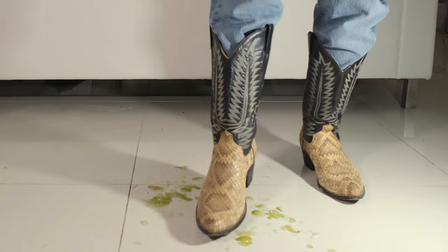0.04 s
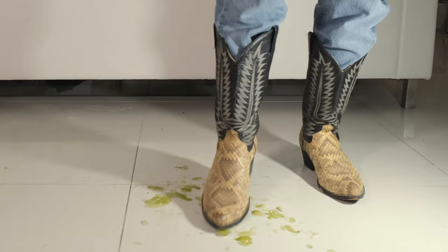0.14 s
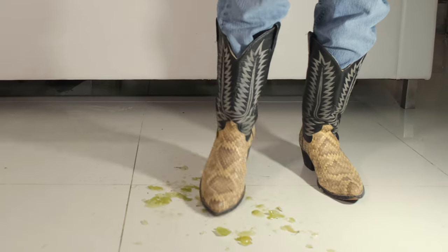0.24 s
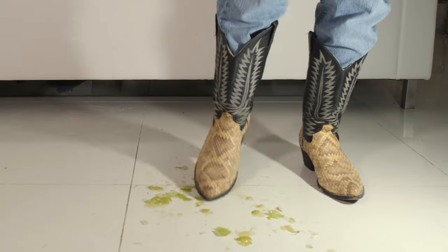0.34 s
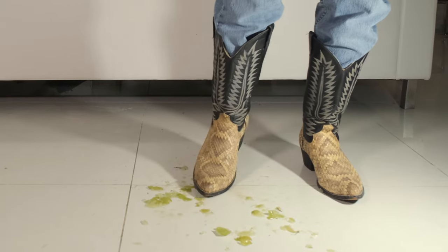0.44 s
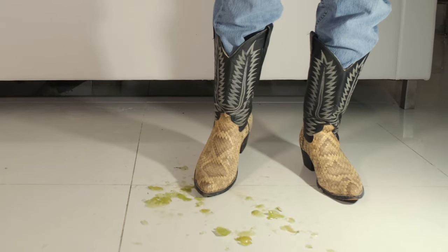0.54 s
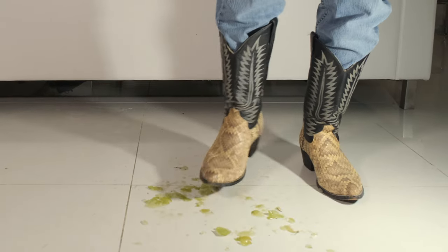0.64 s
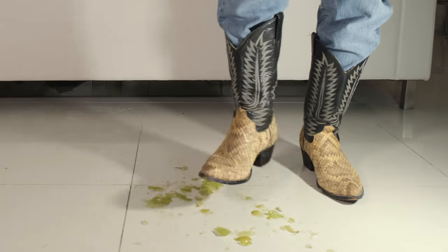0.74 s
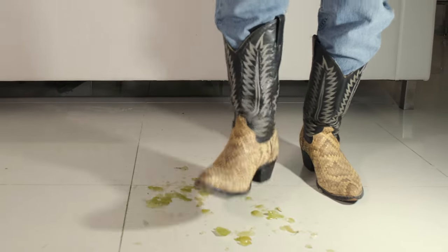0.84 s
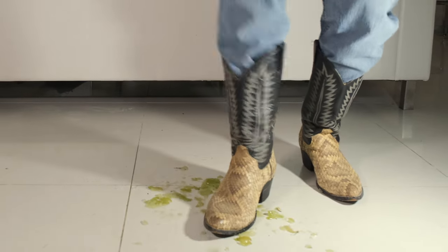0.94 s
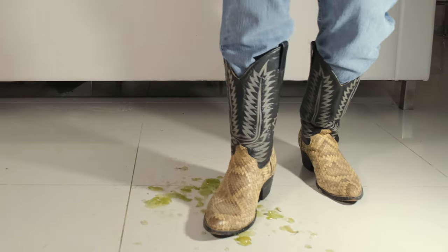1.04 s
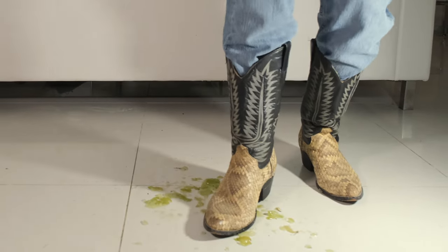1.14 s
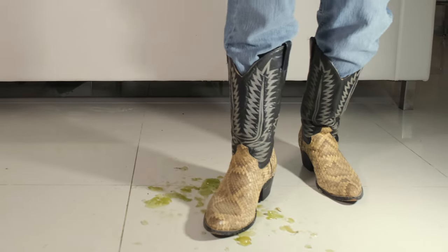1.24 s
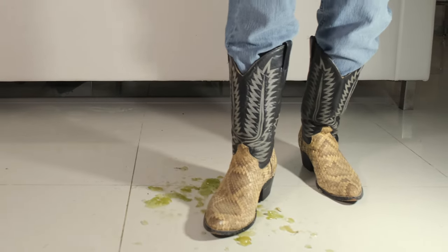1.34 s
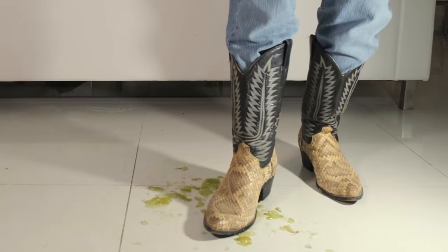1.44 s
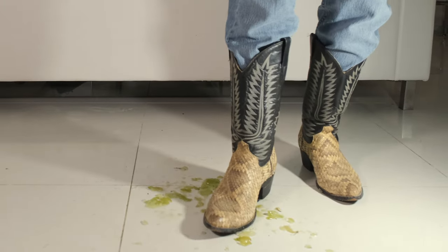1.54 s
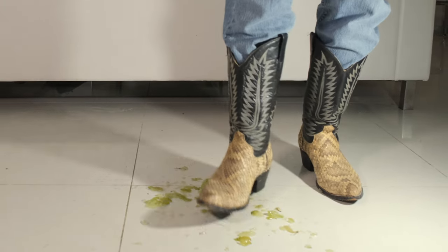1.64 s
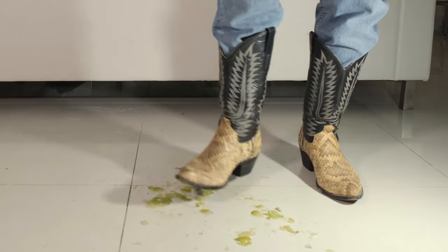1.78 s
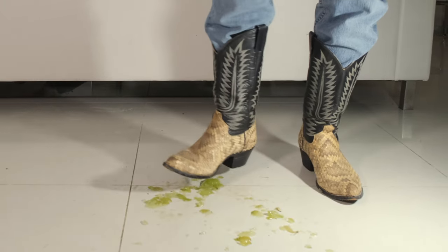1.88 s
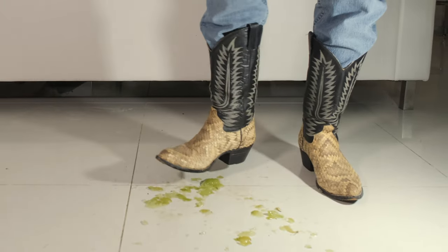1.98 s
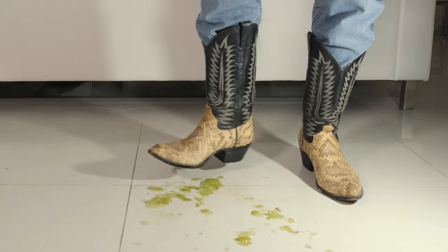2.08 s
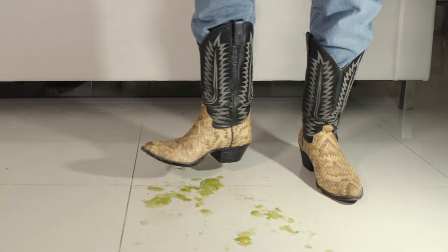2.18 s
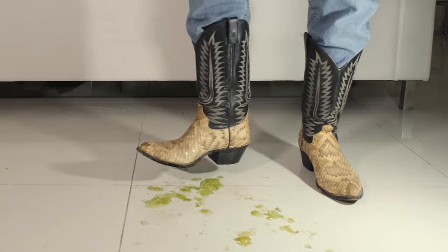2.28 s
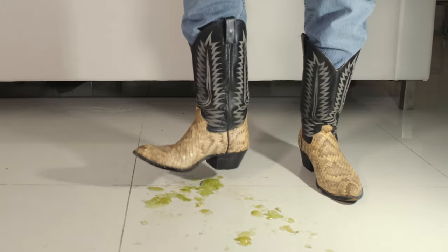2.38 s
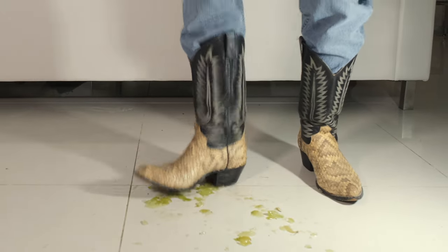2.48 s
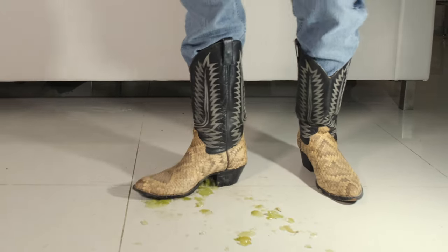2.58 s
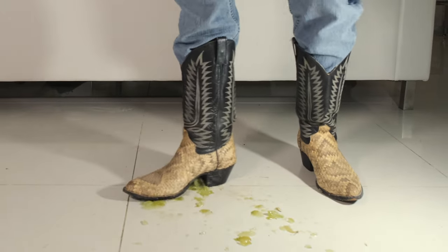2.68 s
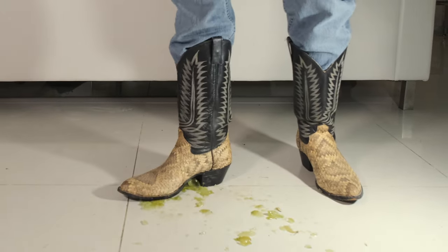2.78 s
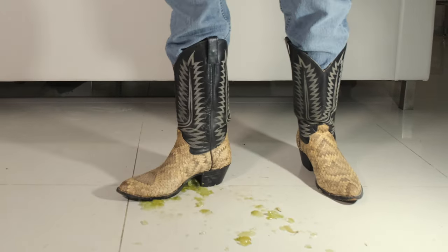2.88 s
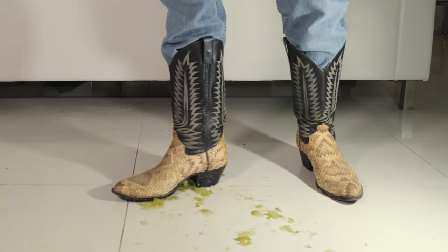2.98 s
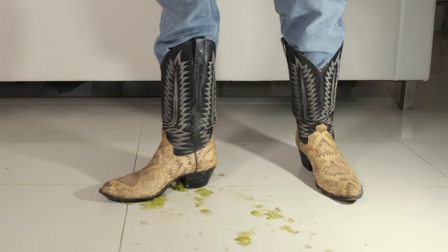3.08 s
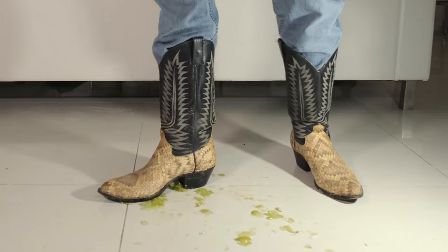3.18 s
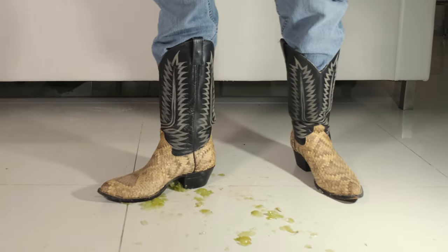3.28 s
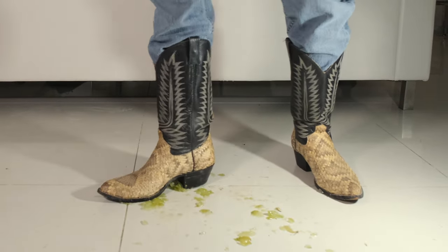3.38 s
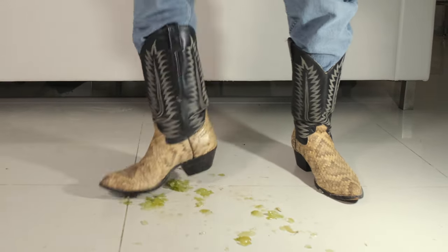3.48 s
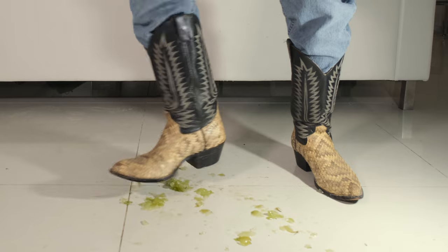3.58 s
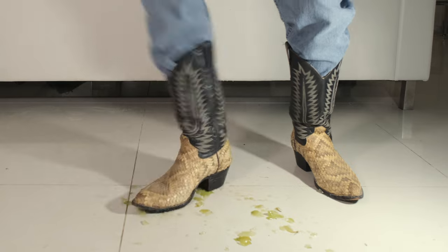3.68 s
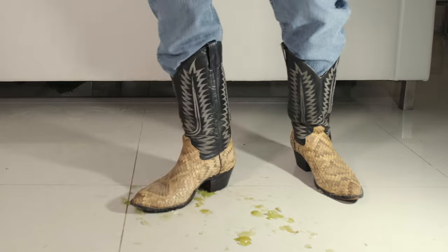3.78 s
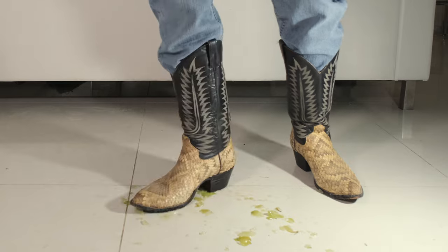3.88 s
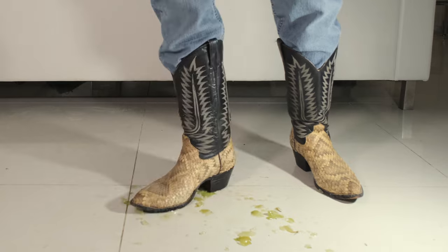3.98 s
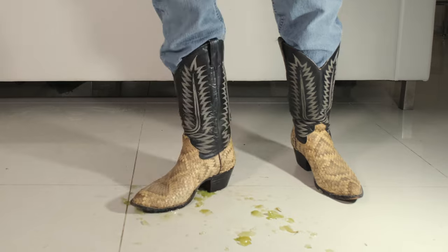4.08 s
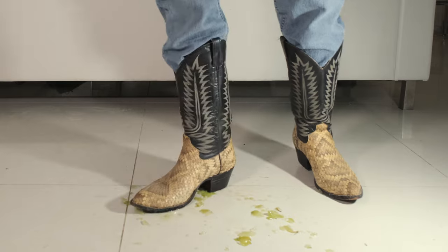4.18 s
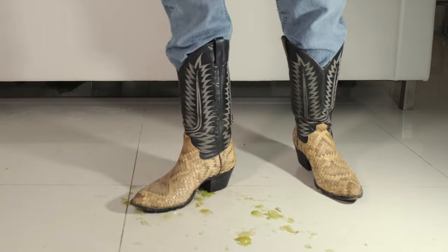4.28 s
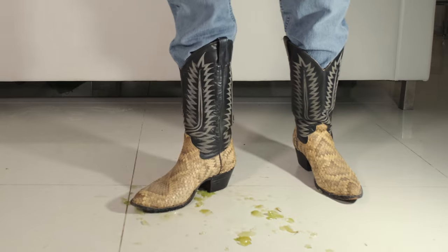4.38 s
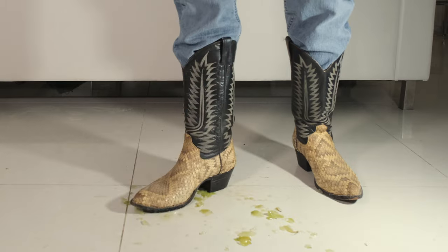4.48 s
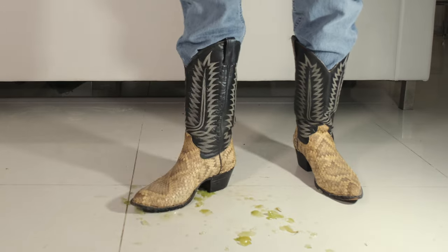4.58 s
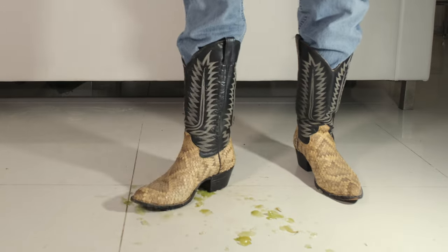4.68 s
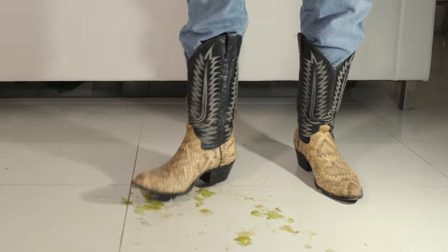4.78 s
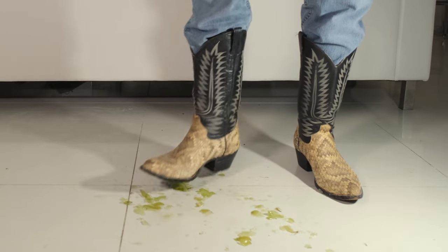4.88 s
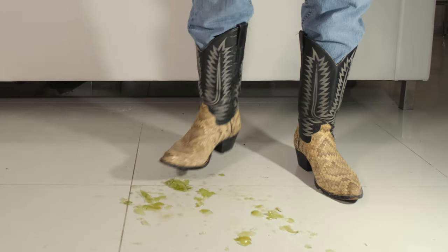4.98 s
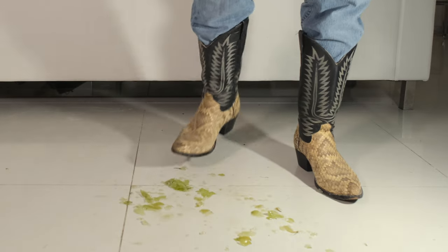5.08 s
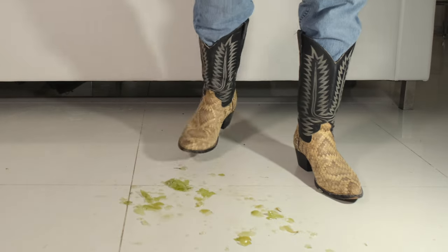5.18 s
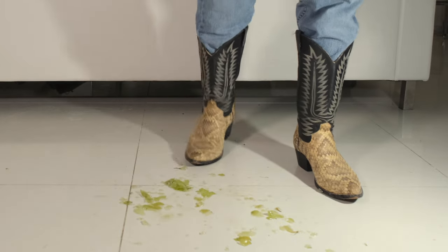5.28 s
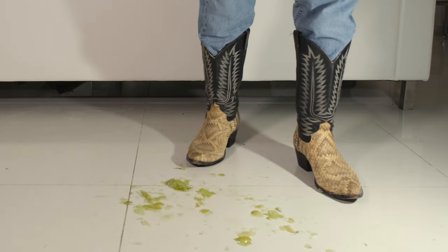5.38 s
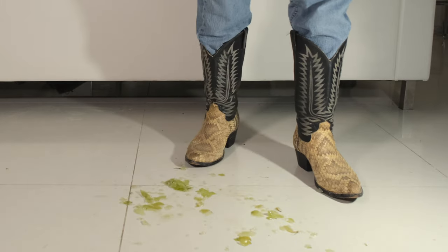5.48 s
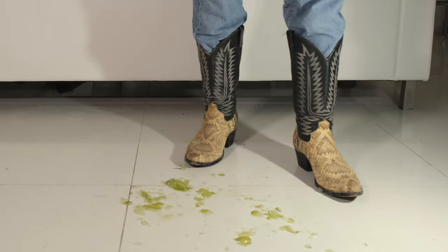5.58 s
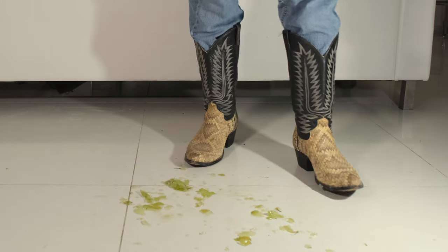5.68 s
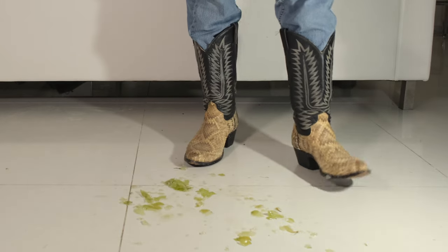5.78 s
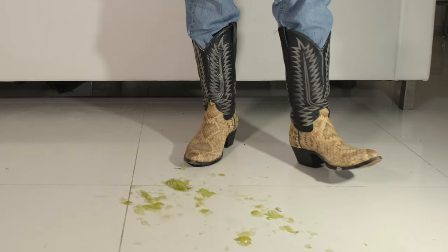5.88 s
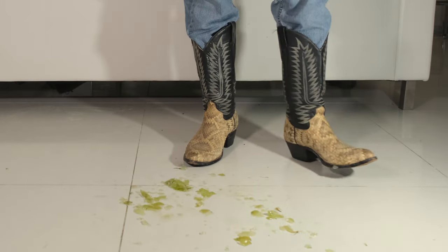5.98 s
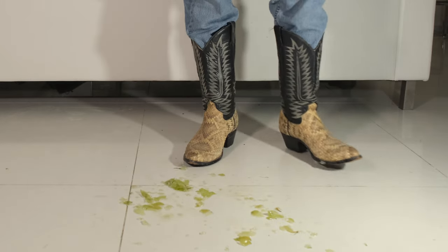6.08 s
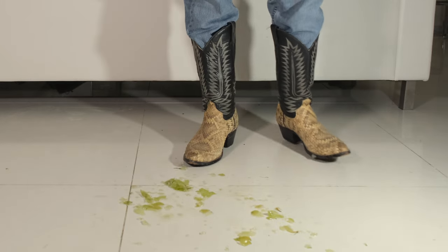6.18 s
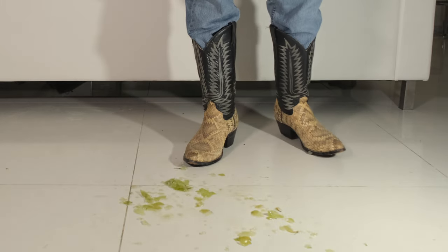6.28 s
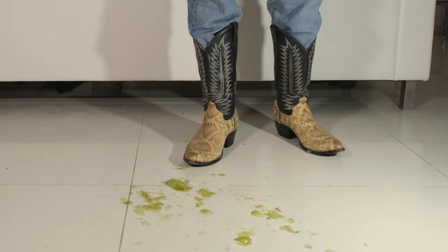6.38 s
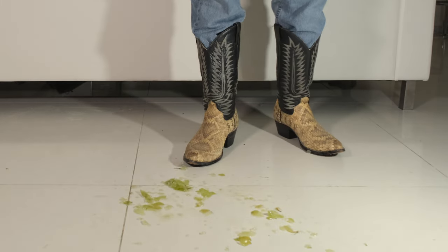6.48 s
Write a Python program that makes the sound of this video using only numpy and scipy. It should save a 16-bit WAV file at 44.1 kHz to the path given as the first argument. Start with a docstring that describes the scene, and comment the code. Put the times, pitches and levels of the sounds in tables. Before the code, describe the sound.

Close to a hard tiled floor in a bare, echoing room, a boot scuffs briefly and its heel stomps hard. Cloth rustles, then a foot lands on soft fruit with a loud, wet, crackling splat and a low floor thud. Sticky ticks follow, another hard heel stomp, then peeling smacks and light, dull steps. Low ventilation hums throughout.

```python
"""Boots on a tiled floor: two hard heel stomps, a squashed fruit, sticky soles peeling off the pulp, light steps.
Heels are short damped swings with a slap of noise; smacks and scuffs are noise bursts in resonances.
Denim and leather rustle as shaped friction noise; ventilation hums as filtered noise; the floor thuds.
A bare, echoing room answers every boot and cloth sound; the hardest blows clip."""
import sys
import numpy as np
from scipy import signal
from scipy.fft import rfft, irfft, next_fast_len
from scipy.io import wavfile
from scipy.ndimage import uniform_filter1d

SR = 44100
rng = np.random.default_rng(int(sys.argv[2]) if len(sys.argv) > 2 else 0)


def dump(signal):
    """Clip the signal to [-1, 1] and save it as 16-bit WAV at the path in sys.argv[1]."""
    limited = np.clip(np.atleast_2d(signal).T, -1, 1)
    pcm = np.round(limited * 32767).astype(np.int16)
    wavfile.write(sys.argv[1], SR, pcm)


N = 288268


def amp(db):
    """Amplitude factor of a level in dB."""
    return 10 ** (np.asarray(db) / 20)


def unit(x):
    """x scaled to RMS 1."""
    return x / np.sqrt(np.mean(x ** 2) + 1e-20)


def peak(x):
    """x scaled to peak 1."""
    return x / np.max(np.abs(x))


def along(points, hz):
    """Interpolates (Hz, value) points on a log frequency axis."""
    point_hz, values = np.transpose(points)
    return np.interp(np.log(hz + 1), np.log(point_hz + 1), values)


def filtered(x, response):
    """x times a complex response of frequency, zero-padded against wrap-around."""
    n = np.shape(x)[-1]
    padded = next_fast_len(n + 8192)
    spectrum = rfft(x, padded) * response(np.fft.rfftfreq(padded, 1 / SR))
    return irfft(spectrum, padded)[..., :n]


def resonance(f, hz, width_hz):
    """One causal resonance of peak gain 1."""
    return 1j * f * width_hz / (hz * hz - f * f + 1j * f * width_hz)


def modes(table):
    """Response of a body: its modes summed with alternating sign."""
    def response(f):
        return sum((-1) ** k * amp(db) * resonance(f, hz, width_hz)
                   for k, (hz, width_hz, db) in enumerate(table))
    return response


# Diffuse sound at the microphone pair. Each row: frequency in Hz, left-right correlation (0 to 1).
LIKENESS = [(60, 1.0), (180, 1.0), (550, 1), (1650, 0.45), (4970, 0.02), (15000, 0.043)]


def diffuse(pair):
    """Mixes two unrelated signals to the likeness that a close microphone pair hears."""
    def mid_side_gains(hz):
        turn = np.arccos(np.clip(along(LIKENESS, hz), -1, 1)) / 2
        return np.array([np.cos(turn), np.sin(turn)])
    mid, side = filtered(pair, mid_side_gains)
    return np.array([mid + side, mid - side])


# Decay of the room. Each row: frequency in Hz, t60 in s.
ROOM_T60 = [(100, 0.45), (300, 0.59), (700, 0.85), (1800, 0.96), (4800, 0.97), (9000, 0.76), (12000, 0.6),
            (15500, 0.12)]
# Colour of the tail. Each row: frequency in Hz, gain in dB.
TAIL_GAIN = [(100, -5), (250, -1), (450, -5.5), (800, -2), (1500, -1.5), (4000, -3.5), (10000, -2.5),
             (15500, 2.5)]
# First echoes. Each row: delay in s, level re direct sound in dB.
WALL_ECHOES = [(.0045, -21), (.008, -13.5), (.012, -19), (0.0215, -22), (.031, -25), (.045, -25.5)]


def room(x, colour):
    """First echoes of x, then a fresh noise tail in which each frequency dies at its own speed."""
    hz, t, noise = signal.stft(rng.standard_normal((2, SR)), SR, nperseg=256)
    decay = amp(-60 * t / along(ROOM_T60, hz)[:, None])
    tail = signal.istft(noise * decay, SR, nperseg=256)[1][:, :SR]
    tail = tail * np.clip(np.arange(SR) / SR / .015, 0, 1)  # builds up over 15 ms
    tail = diffuse(tail / np.linalg.norm(tail[0]))
    tail = filtered(tail, lambda f: amp(along(TAIL_GAIN, f)))
    walls = np.zeros((1, SR))
    for delay_s, db in WALL_ECHOES:
        walls[0, round(delay_s * SR)] = amp(db)
    echoes = signal.fftconvolve(x, walls, axes=1)
    return echoes + signal.fftconvolve(colour[None], tail, axes=1)


def add(mix, s, sound, colour):
    """Places a stereo sound; the tail hears all directions of the source, hence only its mean colour."""
    heard = room(sound, colour)
    heard[:, :sound.shape[1]] += sound
    start = round(s * SR)
    mix[:, start:start + heard.shape[1]] += heard


PORT_LAG_S = 2e-5  # between the two microphone ports, source on the floor


def burst(envelope, response, spiky_db):
    """A stereo noise burst of peak 1, and one click of the same colour and energy."""
    n = len(envelope)
    common, own = rng.standard_normal(n), rng.standard_normal((2, n))
    apart = 0.44  # weight of the noise that differs between the ports
    spikes = amp(spiky_db * rng.standard_normal(n))
    snaps = (common + apart * own) * spikes * envelope

    def ports(f):
        return response(f) * np.exp(-2j * np.pi * f * PORT_LAG_S * np.array([[0], [1]]))
    sound = peak(filtered(snaps, ports))
    impulse = 1. * (np.arange(n) == np.argmax(envelope))
    click = filtered(impulse, response)
    return sound, unit(click) * np.sqrt(np.mean(sound ** 2))


STROKE_DEPTH_DB = 14.5  # start and end level under the peak


def stroke(rise_s, fall_s):
    """Grainy noise, and a level that climbs to its peak and sinks again, with soft edges."""
    noise = rng.standard_normal((2, SR))
    t = np.arange(-rise_s, fall_s, 1 / SR)
    grain = noise[0] * amp(2.7 * unit(uniform_filter1d(noise[1], size=60)))
    edge = np.clip(np.minimum(t - t[0], t[-1] - t) / 0.008, 0, 1)
    level = amp(-STROKE_DEPTH_DB * np.maximum(-t / rise_s, t / fall_s))
    return grain[:len(t)], level * edge


AIR_RMS_DB = -42
# Broad air noise. Each row: frequency in Hz, relative spectral level in dB per Hz.
AIR_SPECTRUM = [(12, -42.5), (20, -1), (37, -6), (54, -9), (103, -2.5), (202, -15), (238, -21),
                (290, -19.5), (549, -21.5), (631, -24), (958, -23), (2920, -32.5), (3350, -32),
                (4430, -37.5), (15500, -45)]
# Duct resonances. Each row: frequency in Hz, width of each of two filter passes in Hz, RMS in dB.
DUCT_MODES = [(62.03, 7.7, -44.5), (101.1, 18, -49), (285.8, 29, -56.5), (969, 43, -59)]


def ventilation():
    """Broad air noise and narrow duct resonances."""
    noise = rng.standard_normal((2, N))
    air = amp(AIR_RMS_DB) * unit(filtered(noise, lambda f: amp(along(AIR_SPECTRUM, f))))
    for hz, width_hz, db in DUCT_MODES:
        noise = rng.standard_normal((2, N))
        air += amp(db) * unit(filtered(noise, lambda f: resonance(f, hz, width_hz) ** 2))
    return diffuse(air)


RISE_SHARE = .07  # rise time constant over t60
# Wet smacks, sticky ticks, low squelches and dull gritty settling under the soles. Each row: time in s,
# peak in dB, centre in Hz, width of each of two filter passes as share of centre, t60 in s.
SOLE_SMACKS = [(.125, -33, 4500, 1.3, .023), (.428, -37, 3800, .5, 0.059), (1.797, -45, 9000, .4, .008),
               (2.173, -52, 7850, .6, 0.0085), (2.195, -38, 10900, 1.1, .017),
               (2.521, -9, 4200, 1.45, 0.041), (2.527, -18.5, 590, 1.35, 0.1),
               (2.541, -6, 4500, 1.8, 0.034), (2.5463, 0.5, 3540, 1.5, 0.012),
               (2.554, -9.5, 4060, 1.75, 0.038), (3.083, -42, 7000, 1.1, .012),
               (3.090, -26.5, 10300, 1.6, .012), (3.128, -31, 3470, 0.44, .05),
               (3.323, -46.5, 3620, .6, .013), (3.411, -45, 3500, .9, .02), (3.474, -21, 3500, 0.82, 0.028),
               (3.482, -17, 2200, 1.4, 0.022), (3.487, -31, 9600, .25, .015),
               (3.493, -18.5, 2800, 0.49, 0.031), (4.465, -30.5, 2450, .95, .013),
               (4.497, -35.5, 387, 0.63, 0.18), (4.549, -34, 1970, 1.1, 0.0122),
               (4.679, -32, 2900, .6, .0095), (4.7, -25, 2380, 1.2, .012),
               (4.701, -30.5, 8400, 0.23, 0.013), (4.745, -44, 9000, .25, .011),
               (4.763, -31.5, 5020, 0.72, .012), (5.02, -41, 7360, .35, .012),
               (5.067, -32, 3670, 0.42, .013), (5.084, -30, 3400, .55, .008),
               (5.318, -23, 5100, 2.5, 0.052), (5.331, -12, 4250, 1.1, .008), (5.337, -22, 7650, 0.74, .09),
               (5.634, -34, 3620, .3, .011), (5.753, -39, 6000, .25, .015), (5.814, -38, 6840, 0.61, .019),
               (5.868, -39, 6260, 0.41, 0.017), (6.346, -31, 1580, 0.62, .02),
               (6.386, -32.5, 710, 0.73, .118), (6.43, -42, 503, 0.9, 0.11)]


def smacks(mix):
    """Bursts of tiny spiky snaps, in the band that each row gives."""
    t = np.arange(SR // 5) / SR
    for s, db, hz, share, t60 in SOLE_SMACKS:
        envelope = amp(-60 * t / t60) * (1 - np.exp(-t / (RISE_SHARE * t60))) ** 2
        sound, click = burst(envelope, lambda f: resonance(f, hz, share * hz) ** 2, spiky_db=4)
        add(mix, s - .001, amp(db) * sound, amp(db) * click)


# Strokes of cloth and sliding soles. Each row: time of the peak in s, rise in s, fall in s,
# RMS at the peak in dB, centre in Hz.
RUSTLE_STROKES = [(.13, 0.028, 0.4, -50, 3400), (.42, 0.077, .14, -54.5, 3100),
                  (2.2, .015, 0.26, -50.5, 2140), (3.1, 0.041, 0.094, -44, 3550),
                  (3.46, 0.11, 0.037, -45.5, 2900), (4.699, .06, 0.14, -50.5, 3640),
                  (5.66, .13, .16, -57.5, 2950), (5.85, 0.059, .02, -57, 3500),
                  (6.34, .22, 0.19, -52, 2350)]


def rustle(mix):
    """Friction noise through a bank of fixed bands, weighted around the centre of each stroke."""
    bank_hz = np.geomspace(1000, 12000, num=12)[:, None]
    for s, rise_s, fall_s, db, hz in RUSTLE_STROKES:
        grain, envelope = stroke(rise_s, fall_s)
        weight = np.exp(-np.log(bank_hz / hz) ** 2 / 0.7 ** 2) / np.sqrt(bank_hz)
        bands = filtered(grain, lambda f: (weight * resonance(f, bank_hz, 0.16 * bank_hz)).sum(0))
        rub = amp(db) * envelope * unit(bands)
        add(mix, s - rise_s, np.array([rub, rub]), rub)


SKID_DB = -10  # broad scrape between the modes of the sole
# The sole scuffs the tile. Each row: time in s, peak in dB, rise time constant in s, t60 in s,
# tilt in dB per octave.
SOLE_SCUFFS = [(.605, -20, 0.0029, 0.039, 1.5), (.633, -28, 0.0082, .09, 5.5),
               (5.848, -30.5, .003, .09, -10.5)]
# Modes of the sole. Each row: frequency in Hz, width in Hz, gain in dB.
SOLE_MODES = [(2660, 170, -3), (3600, 120, 4), (4050, 93, -1), (4500, 160, 1), (4860, 98, 0),
              (5700, 270, -5.5), (5900, 630, -11), (6940, 300, -11), (8350, 880, -15.5)]


def scuffs(mix):
    """A short skid rings the stiff sole."""
    t = np.arange(SR // 5) / SR
    for s, db, rise_s, t60, tilt_db in SOLE_SCUFFS:
        envelope = amp(-60 * t / t60) * (1 - np.exp(-t / rise_s)) ** 2

        def tilted_sole(f):
            sole = modes(SOLE_MODES)(f) + amp(SKID_DB) * resonance(f, 3360, 3500) ** 2
            return sole * amp(tilt_db * np.log2((f + 1) / 3600))
        sound, click = burst(envelope, tilted_sole, spiky_db=0.0)
        add(mix, s - .001, amp(db) * sound, amp(db) * click)


# Heel and sole knocks. Each row: time in s, knock peak in dB, slap re knock in dB, pitch in Hz,
# contact time in swings of the pitch.
BOOT_KNOCKS = [(.958, -1, 2.5, 453, 1.47), (1.588, -28, -18.5, 304, 1.4), (2.546, -14, 2, 340, 0.57),
               (2.562, -22.5, 2, 182, 0.62), (3.186, -30.5, -13, 320, 1.77), (3.369, -32, -17, 334, 1.52),
               (3.691, -1, 4.5, 440, 1.45), (3.7131, -7, -23, 476, 0.75), (4.494, -27.5, -16, 363, 1.75),
               (5.083, -36, -11, 477, 2), (5.319, -26, -4, 385, .9), (5.4445, -22.5, -10, 376, 1.5),
               (5.857, -26, -8.5, 467, 2.3), (5.928, -30.5, -27, 445, 1.9), (6.347, -25, -22, 500, 1.5),
               (6.384, -22.5, -22, 512, 1.8), (6.405, -21, -29, 341, 2.3)]
# Upper modes of the heel block on tile. Each row: frequency in Hz, width in Hz, gain in dB.
HEEL_MODES = [(827, 170, 2.5), (1280, 400, 0.5), (1633, 720, 0), (1943, 360, 0.5), (2800, 776, 1.5),
              (4200, 1550, 0), (7700, 5700, -8.5)]


def knocks(mix):
    """The boot swings briefly while pressed on the tile; the slap of the leather excites upper modes."""
    t = np.arange(SR // 10) / SR
    for s, db, slap_db, hz, swings in BOOT_KNOCKS:
        contact_s = swings / hz
        pressure = (t / contact_s) ** 2 * np.exp(-(t / contact_s) ** 2)
        swing = np.sin(2 * np.pi * hz * t)
        swing += 0.37 * np.sin(2 * np.pi * 1.72 * hz * t)
        swing += 0.19 * np.sin(2 * np.pi * 0.28 * hz * t)
        body = peak(pressure * swing)
        slap_envelope = (t / contact_s) ** 2 * np.exp(-2.8 * t / contact_s)
        slap, click = burst(slap_envelope, modes(HEEL_MODES), spiky_db=4)
        add(mix, s, amp(db) * (body + amp(slap_db) * slap), amp(db) * (body + amp(slap_db) * click))


# Denim slides along the boot shaft. Each row: time of the peak in s, rise in s, fall in s,
# RMS at the peak in dB.
SHAFT_STROKES = [(1.974, .1, 0.065, -44)]
# Resonances of the shaft. Each row: frequency in Hz, width in Hz, gain in dB.
SHAFT_MODES = [(2250, 350, -5), (4200, 410, -5), (4850, 230, -4), (6400, 510, -7), (8900, 810, -25)]


def shaft(mix):
    """Friction noise in the resonances of the leather tube."""
    for s, rise_s, fall_s, db in SHAFT_STROKES:
        grain, envelope = stroke(rise_s, fall_s)
        rub = amp(db) * envelope * unit(filtered(grain, lambda f: 0.1 + modes(SHAFT_MODES)(f)))
        add(mix, s - rise_s, np.array([rub, rub]), rub)


# The floor shakes under the weight. Each row: start in s, level in dB, frequency in Hz, t60 in s.
FLOOR_THUDS = [(2.547, -27.5, 35.4, 0.89), (2.553, -26, 55, 0.24)]


def thud():
    """Low damped swings of the floor, the same at both ports."""
    t = np.arange(N) / SR
    floor = np.zeros(N)
    for s, db, hz, t60 in FLOOR_THUDS:
        since = np.maximum(t - s, 0)
        floor += amp(db) * np.sin(2 * np.pi * hz * since) * amp(-60 * since / t60)
    return floor


def scene():
    """Boot and cloth sounds in the room, plus floor thuds and ventilation."""
    mix = np.zeros((2, N + 2 * SR))
    for add_source in (smacks, rustle, scuffs, knocks, shaft):
        add_source(mix)
    return mix[:, :N] + thud() + ventilation()


TOP_HZ = 15800  # band limit


def record(dry):
    """The microphone dulls the treble, the input clips at full scale, the band limit cuts the rest."""
    capsule = filtered(dry, lambda hz: 1 / (1 + 1j * hz / 12000) ** 2)
    clipped = capsule / (1 + np.abs(capsule) ** 8) ** (1 / 8)
    return filtered(clipped, lambda hz: hz < TOP_HZ)


dry = scene()
out = record(dry)
dump(out)
```